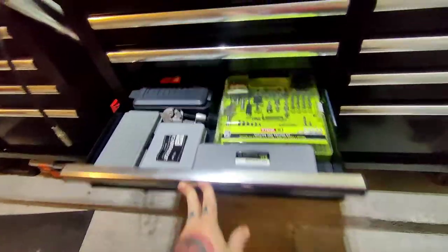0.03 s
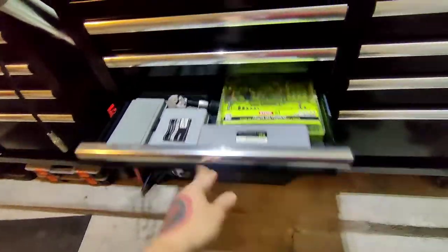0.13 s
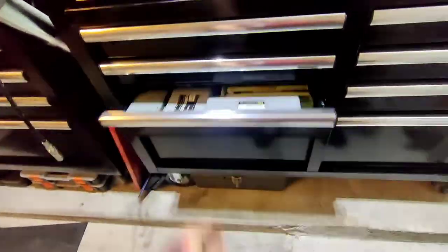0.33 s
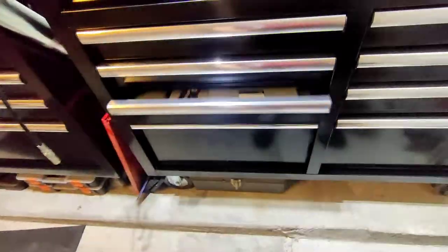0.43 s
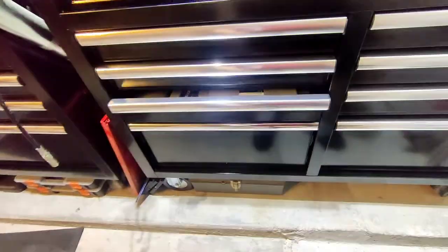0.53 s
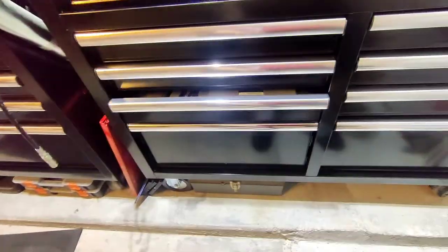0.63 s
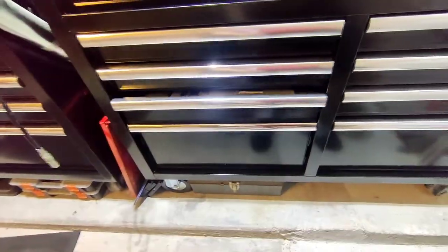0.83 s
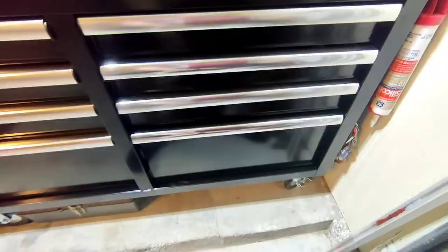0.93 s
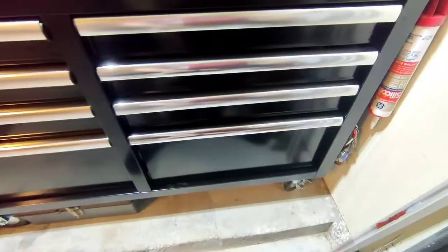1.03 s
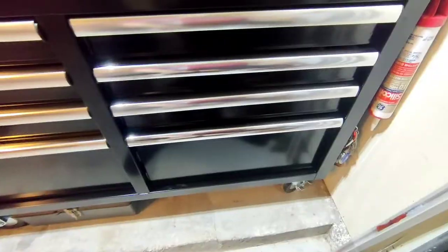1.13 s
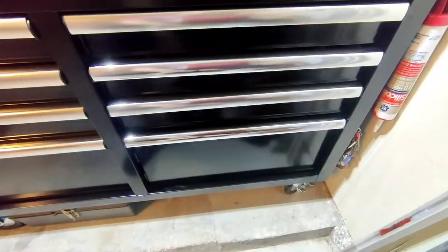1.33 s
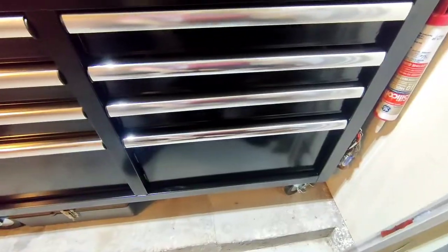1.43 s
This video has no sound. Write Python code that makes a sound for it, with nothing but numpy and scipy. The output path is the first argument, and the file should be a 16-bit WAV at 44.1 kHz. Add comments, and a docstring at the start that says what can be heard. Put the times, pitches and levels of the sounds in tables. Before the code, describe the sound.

A metal tool drawer rolls shut with a click and a clattering slam.

```python
"""A loaded steel tool drawer is pushed shut in a garage: it rolls, knocks, clicks past its catch and
slams home, and the tools slide against the front. Each blow is a burst of dense steel modes with one
note of its own; the chest's panels, small metal parts and the room ring on. A dull knock follows,
and fingers tap the microphone over a low handling rumble."""
import sys
import numpy as np
from scipy import signal
from scipy.fft import rfft, irfft, next_fast_len
from scipy.io import wavfile
from scipy.ndimage import map_coordinates

SR = 44100
rng = np.random.default_rng(int(sys.argv[2]) if len(sys.argv) > 2 else 0)


def waveform_to_disk(signal):
    """Save audio, clipped to [-1, 1], as 16-bit WAV at the path in sys.argv[1]."""
    frames = np.transpose(np.atleast_2d(signal))
    scaled = np.clip(frames, -1, 1) * 32767
    samples = np.round(scaled).astype(np.int16)
    wavfile.write(sys.argv[1], SR, samples)


N = 66150
BLOW_ATTACK_S = 0.0012
LEFT_RIGHT = np.array([[.5], [-.5]])  # splits a phase or level gap between the channels

# drawer and tool blows, then a dull knock and a finger tap's tick with its room ring
# (time [s], hold [s], t60 [s], panel ring [dB], note [Hz], note level [dB], note t60 [s],
# then relative level [dB] in each band)
BLOWS = [(.2115, 0.008, 0.066, -3.5, 278, -31.5, 0.23, -32, -40, -40, -44, -45, -47.5),
         (.268, 0.0059, 0.057, -4, 100, -31.5, 0.15, -44, -43, -47, -40, -51, -66),
         (0.35, .004, 0.17, 1, 594, -33.5, 0.058, -38.5, -48, -46.5, -44, -53, -47),
         (0.3624, 0.0044, 0.12, 3, 285.5, -26.5, 0.21, -35, -38.5, -39.5, -33.5, -30.5, -31),
         (.3725, .006, 0.11, -8, 294, -25, 0.13, -36, -34.5, -34, -36.5, -35, -37.5),
         (.385, 0.0046, 0.2, -7, 168.5, -24.5, 0.13, -33.5, -34, -36, -37.5, -50, -48),
         (.414, 0.0036, 0.061, 2.5, 361, -27, 0.096, -33, -30.5, -30.5, -36, -31.5, -34),
         (.4192, .003, 0.084, 3.5, 299, -18, 0.052, -30, -29, -34, -31, -34.5, -40.5),
         (.433, .012, 0.11, 0, 649, -33, 0.11, -47, -42, -36, -38.5, -44.5, -44),
         (0.4556, 0.0083, 0.039, 1.5, 900.5, -19.5, 0.13, -31.5, -33.5, -32.5, -31.5, -32.5, -36),
         (.682, 0.009, 0.17, 3, 729, -41.5, 0.24, -40.5, -44.5, -45.5, -50, -62, -64),
         (0.7478, 0.00064, 0.03, -7, 1650, -20, 0.01, -37, -53.5, -50.5, -50, -53, -53.5)]
# blow bands (frequency [Hz])
BANDS_HZ = [90, 300, 900, 2300, 4000, 6200]
# struck steel spectrum (frequency [Hz], density [dB])
STEEL = [(30, 7.5), (90, 5), (200, 3.5), (290, 3.5), (480, 2), (900, 0.5), (1250, 1), (1600, -4.5),
         (2400, -3), (3200, -5.5), (4400, -7.5), (4900, -11.5), (5500, -6), (6300, -8), (7500, -16),
         (9000, -32), (13500, -28), (15500, -44)]
def blows():
    """Each blow is a rattling burst of dense modes with one note of its own, answered by the room."""
    clatter_db, burst_samples = 5.5, 12288
    out, hits, comb = np.zeros((2, N)), [], small_modes()
    t = np.arange(burst_samples) / SR
    for s, hold, t60, _, note_hz, note_db, note_t60, *band_dbs in BLOWS:
        colour = list(zip(BANDS_HZ, band_dbs))
        steel = filtered(noise(STEEL, burst_samples), lambda hz: amp(along(colour, hz)))
        rattle = amp(clatter_db + wobble(498)[:burst_samples])
        burst = steel * struck(t, hold, t60) * rattle
        start = round(s * SR)
        out[:, start:start + burst_samples] += burst + amp(note_db) * note(t, note_hz, note_t60)
        hits.append((s, colour))
    return out + amp(clatter_db) * steel_reverb(comb, hits)


def note(t, hz, t60):
    """The short, rough note of the struck part."""
    rough_rad = 0.38 * wobble(170)[:len(t)]
    phase = 2 * np.pi * hz * t + rough_rad + phase_gap(hz) * LEFT_RIGHT
    return fade(t, attack_s=0.0041, t60=t60) * np.sin(phase)


def small_modes(spacing_hz=23.9, depth_db=4):
    """The steel's many small modes: a random comb of gain against frequency, shallower below 1 kHz."""
    knots = rng.standard_normal(4096)
    rms = np.sqrt(np.mean(amp(depth_db * knots) ** 2))
    def comb(hz):
        share = np.clip(hz / 1000, 0, 1)
        return amp(depth_db * map_coordinates(knots, [hz / spacing_hz]) * share) / rms ** share ** 2
    return comb


# chest panel modes (frequency [Hz], relative level [dB], t60 [s])
PANEL_MODES = [(283.5, -12.5, 0.18), (310, -24, 0.12), (345, -18, 0.49), (382, -20, 0.24), (562, -19, 0.55),
               (621.7, -11, 0.43), (878, -10.5, 0.54), (996.6, -4, 0.2), (1250, -11.5, 0.18),
               (1180, -14, 0.11)]
def panels(gain_db=-4):
    """The sheet metal's strongest modes, rung anew by each blow."""
    t, out = since(0), np.zeros((2, N))
    for hz, db, t60 in PANEL_MODES:
        ring = np.exp((2j * np.pi * hz - np.log(1000) / t60) * t)
        total = np.zeros(N, complex)
        for (s, _, _, ring_db, _, _, _, *band_dbs), turn in zip(BLOWS, rng.random(len(BLOWS))):
            start = round(s * SR)
            drive = amp(db + ring_db + along(list(zip(BANDS_HZ, band_dbs)), hz))
            total[start:] += drive * np.exp(2j * np.pi * turn) * ring[:N - start]
        gap_rad = rng.choice([-1, 1]) * phase_gap(hz)
        out += (np.exp(1j * gap_rad * LEFT_RIGHT) * total).real
    return amp(gain_db) * lowpass(out)


# ring gain (time [s], level [dB])
RING_DROP = [(.805, 0), (.825, -6.5)]
def impacts():
    """The blows and the panels they ring; the tail drops abruptly."""
    return (blows() + panels()) * level(RING_DROP)


def thud(time_s=.365, floor_hz=126, chest_hz=42.3):
    """The drawer's floor thumps and the whole chest rocks as the drawer hits its stop."""
    t = since(time_s)
    thump = amp(-29.5) * fade(t, BLOW_ATTACK_S, t60=0.14) * np.sin(2 * np.pi * floor_hz * t)
    rock = amp(-24.5) * fade(t, attack_s=0.0073, t60=0.51) * np.sin(2 * np.pi * chest_hz * t)
    return thump - rock


# slide stop, loose tool and drawer front modes (frequency [Hz], relative level [dB], t60 [s])
STOP_MODES = [(978, -37.5, 0.13), (1280, -33, 0.16), (4730, -35, 0.11), (6320, -42, 0.062)]
TOOL_MODES = [(815, -28, 0.074), (1069, -31, 0.073), (1230, -29.5, 0.081), (2690, -31, 0.14),
              (3090, -38, 0.11), (4620, -35, 0.12), (5846, -48, 0.15), (6500, -48, .12),
              (7369, -41.5, 0.11)]
FRONT_MODES = [(694, -37.5, 0.29), (738, -29, 0.31), (827, -29.5, 0.15), (1006, -34, 0.13),
               (1208, -41, 0.24)]
def clinks(stop_s=.3638, tool_s=.4152, front_s=.4475):
    """The slide meets its stop, a loose tool hits the front, and the front clanks into its seat."""
    stop = amp(0.5) * metal_part(stop_s, STOP_MODES)
    tool = amp(-0.5) * metal_part(tool_s, TOOL_MODES)
    return stop + tool + metal_part(front_s, FRONT_MODES)


def metal_part(time_s, modes):
    """A small struck metal part: its modes ring out, a little unsteady."""
    t, out = since(time_s), np.zeros((2, N))
    for hz, db, t60 in modes:
        rough_rad = 0.32 * wobble(120)
        gap_rad = rng.choice([-1, 1]) * phase_gap(hz)
        phase = 2 * np.pi * hz * t + rough_rad + gap_rad * LEFT_RIGHT
        out += amp(db) * fade(t, attack_s=0.00066, t60=t60) * np.sin(phase)
    return out


# latch clack spectrum (frequency [Hz], density [dB])
CLACK = [(2000, -32), (3100, -16), (3550, 0), (4300, -1), (4800, -26), (7000, -49)]
# latch modes (frequency [Hz], level [dB], t60 [s])
LATCH_MODES = [(2165, -42, 0.17), (2390, -30.5, 0.064), (3360, -46.5, 0.47), (3646, -30, 0.038),
               (4100, -27, .055), (4350, -30.5, 0.057), (5110, -49, 0.18), (5850, -45.5, 0.23),
               (6800, -52, 0.16), (7420, -42, .06)]
def latch(time_s=.4565):
    """The latch snaps home with a hard, ringing clack on the last blow of the slam."""
    clack = noise(CLACK) * struck(since(time_s), hold_s=0.0066, t60=0.046)
    return amp(-31.5) * clack + metal_part(time_s, LATCH_MODES)


# catch snap spectrum (frequency [Hz], density [dB])
SPRING = [(1000, -49), (4000, -11.5), (4600, -11.5), (5000, -3), (5250, -4), (5650, -0.5), (5950, -5.5),
          (6500, -8), (7400, -15), (9000, -32), (13500, -27.5), (16000, -40)]
# catch modes (frequency [Hz], level [dB], t60 [s])
CATCH_MODES = [(5120, -31.5, .05), (5520, -40, 0.16), (5750, -42, 0.21), (6360, -35.5, .04)]
def catch(time_s=.2682, room_db=-11.5):
    """The slide's sprung catch snaps with a bright click and a thin ring."""
    spring = noise(SPRING)
    snap = spring * struck(since(time_s), hold_s=0.003, t60=0.041)
    room = garage(spring, [(time_s, [(1000, room_db)])])
    return amp(-30.5) * (snap + room) + metal_part(time_s, CATCH_MODES)


# roll and scrape envelopes (time [s], level [dB])
ROLL = [(0, -46.5), (.03, -47), (.19, -48.5), (.25, -44), (.34, -46), (.39, -100)]
SCRAPE = [(.385, -88), (.399, -39.5), (.412, -51), (.44, -100)]
# bearing and scrape spectra (frequency [Hz], density [dB])
BEARINGS = [(60, -5), (100, -9), (200, -5.5), (290, -2), (450, -9.5), (600, -10.5), (1300, -24.5),
            (1700, -27), (6100, -34), (9000, -50.5), (14000, -64)]
SCRAPE_COLOUR = [(9000, -38), (13000, -4.5), (15000, -7)]
def slides(flutter_db=0.95):
    """The slides roll on their bearings, then scrape thinly as they seat."""
    rolling = noise(BEARINGS) * level(ROLL) * amp(flutter_db * wobble(69.5))
    return rolling + level(SCRAPE) * noise(SCRAPE_COLOUR)


# settling ticks (time [s], level [dB])
TICKS = [(1.014, -61), (1.134, -63)]
def settling_tools():
    """The tools tick faintly as they settle in the shut drawer."""
    colour = [(300, 0), (2300, -4), (4000, -16), (9000, -35)]  # (frequency [Hz], density [dB])
    return noise(colour) * sum(amp(db) * fade(since(s), BLOW_ATTACK_S, t60=.03) for s, db in TICKS)


# taps (time [s], push [dB], push decay [s], tick [dB], tick [Hz], tick t60 [s], left re right [dB])
TAPS = [(0.6713, -7.5, 0.00067, -20, 5850, 0.0021, -39), (0.7486, -29, 0.0014, -28.5, 4160, 0.0029, -8.5),
        (0.8119, -33.5, 0.0023, -63, 2000, .004, -33)]
def finger_taps(rise_s=0.00015, recoil_ratio=6.3):
    """Fingers tap the microphone: a pressure push, its slower recoil and a tick, mostly on the right."""
    out = np.zeros((2, N))
    for s, push_db, decay_s, tick_db, hz, t60, left_db in TAPS:
        t = since(s)
        push = (1 - np.exp(-t / rise_s)) * np.exp(-t / decay_s)
        recoil_age = t / (decay_s * recoil_ratio / 2)
        recoil = 2.6 * recoil_age * np.exp(-recoil_age) / recoil_ratio
        tick = fade(t, rise_s, t60) * np.sin(2 * np.pi * hz * t)
        out += np.outer([amp(left_db), 1], amp(push_db) * (push - recoil) + amp(tick_db) * tick)
    return lowpass(out)


# reverb send (frequency [Hz], level [dB])
REVERB_SEND = [(80, -9), (300, -6.5), (900, -10.5), (2500, -7.5), (6000, -7.5), (12000, -5.5)]
def steel_reverb(comb, hits):
    """The steel's small modes ring on in the room."""
    steel = filtered(noise(STEEL), lambda hz: comb(hz) * amp(along(REVERB_SEND, hz)))
    return garage(steel, hits)


# room decay (frequency [Hz], t60 [s])
GARAGE_T60 = [(60, 0.65), (300, 0.72), (900, 0.6), (2500, 0.6), (6000, 0.5), (13000, 0.33)]
def garage(steady, hits, rise_s=0.015):
    """Shapes steady noise into the room's answer to hits (time [s], colour); the treble dies first."""
    hz, t, spectra = signal.stft(steady, SR, nperseg=256)
    t60 = along(GARAGE_T60, hz)[:, None]
    power = 0
    for s, colour in hits:
        tail = amp(along(colour, hz))[:, None] * fade(np.maximum(t - s, 0), rise_s, t60)
        power += tail ** 2
    return signal.istft(spectra * np.sqrt(power), SR, nperseg=256)[1][:, :N]


# handling envelope (time [s], level [dB])
HANDLING = [(0, -71), (.2, -63), (.3, -51), (.345, -58), (.5, -43), (.72, -48.5), (.87, -59), (1.3, -59),
            (1.45, -53.5)]
# rumble spectrum (frequency [Hz], density [dB])
RUMBLE = [(20, 0), (40, 9), (70, 1.5), (110, -9), (190, -34), (400, -68)]
def handling():
    """The hand-held microphone rumbles as it moves."""
    return level(HANDLING) * noise(RUMBLE)


# noise floor and hiss spectra (frequency [Hz], density [dB])
FLOOR = [(20, -3.5), (45, 0), (84, -15.5), (120, -6.5), (180, -21), (240, -25.5), (310, -32), (362, -20.5),
         (410, -31.5), (670, -28), (1310, -36), (3000, -39.5), (6500, -41), (9000, -52), (12500, -59),
         (15000, -76)]
HISS_COLOUR = [(500, -25), (3000, 0.5), (6500, 3.5), (9000, -19)]
# hiss envelope (time [s], level [dB])
HISS = [(1.38, -85), (1.48, -65.5), (1.5, -65)]
def background(floor_db=-54):
    """A steady low noise floor; a faint hiss rises at the end."""
    return amp(floor_db) * noise(FLOOR) + level(HISS) * noise(HISS_COLOUR)


# left-right likeness (frequency [Hz], correlation [-1..1])
CORRELATION = [(40, 0.91), (250, 0.96), (600, 0.62), (1200, 0.1), (2500, 0.043), (8000, 0.033)]
def phase_gap(hz):
    """Left-right phase angle [rad], small in the bass."""
    return np.arccos(np.clip(along(CORRELATION, hz), -1, 1))


def noise(spectrum, size=N):
    """Stereo noise of rms 1, nearly mono in the bass."""
    def response(hz):
        angle = phase_gap(hz) / 2
        return amp(along(spectrum, hz)) * [np.cos(angle), np.sin(angle)]
    mid, side = filtered(rng.standard_normal((2, size)), response)
    stereo = np.array([mid + side, mid - side])
    return stereo / np.sqrt(np.mean(stereo ** 2) + 1e-20)


def amp(db):
    return 10 ** (np.asarray(db) / 20)


def along(points, hz):
    """Interpolates (frequency [Hz], value) points on a log axis."""
    knots_hz, values = np.transpose(points)
    return np.interp(np.log(hz + 1), np.log(knots_hz + 1), values)


def since(s):
    """Seconds since s, zero before."""
    return np.maximum(np.arange(N) / SR - s, 0)


def level(points):
    """Gain per sample from (time [s], level [dB]) points."""
    return amp(np.interp(since(0), *np.transpose(points)))


def fade(t, attack_s, t60):
    """Quick rise, exponential decay."""
    return (1 - np.exp(-t / attack_s)) * np.exp(-np.log(1000) * t / t60)


def struck(t, hold_s, t60):
    """Quick rise, a hold while the parts chatter, exponential decay."""
    return (1 - np.exp(-t / BLOW_ATTACK_S)) * np.exp(-np.log(1000) * np.maximum(t - hold_s, 0) / t60)


def wobble(rate_hz):
    """Smooth random curve, rate_hz knots a second."""
    knots = rng.standard_normal(int(N * rate_hz / SR) + 4)
    return map_coordinates(knots, [np.arange(N) * rate_hz / SR])


def filtered(x, response):
    """Applies the gain response(hz) by padded FFT."""
    n = x.shape[-1]
    padded = next_fast_len(n + 2048)
    return irfft(rfft(x, padded) * response(np.fft.rfftfreq(padded, 1 / SR)), padded)[..., :n]


def lowpass(x, cutoff_hz=7800):
    return filtered(x, lambda hz: 1 / (1 + (hz / cutoff_hz) ** 10))


# stereo balance (frequency [Hz], left re right [dB])
BALANCE = [(60, -1), (130, 0.5), (280, 0.5), (600, 2), (1000, 2), (2200, -2.5), (4500, -4), (8000, 1),
           (13000, 1.5)]
def scene():
    """Strikes, slides and background, balanced left to right, plus the taps."""
    bed = slides() + background() + handling()
    strikes = impacts() + thud() + clinks() + catch() + latch() + settling_tools()
    balanced = filtered(strikes + bed, lambda hz: amp(along(BALANCE, hz) * LEFT_RIGHT))
    return balanced + finger_taps()


def record(dry, top_hz=15500):
    """Brick-wall band limit."""
    return filtered(dry, lambda hz: hz < top_hz)


dry = scene()
out = record(dry)
waveform_to_disk(out)
```